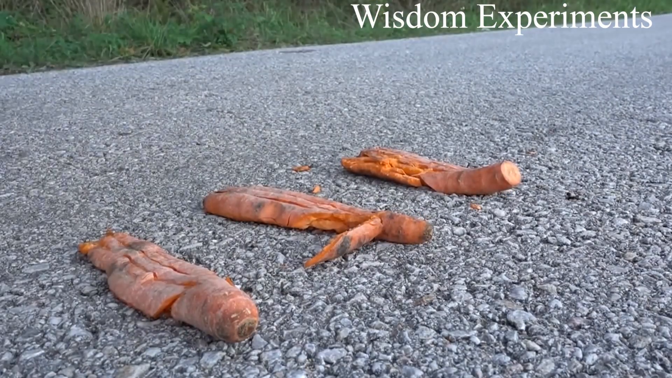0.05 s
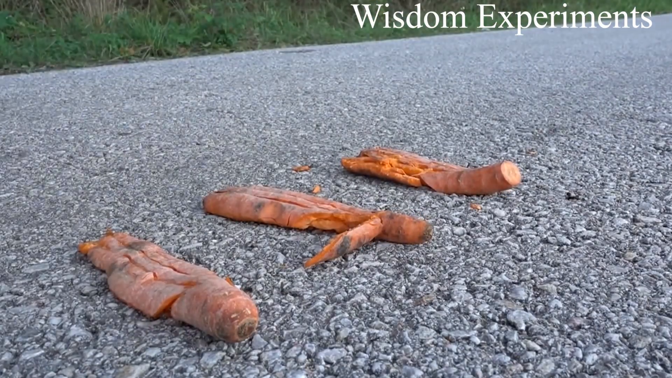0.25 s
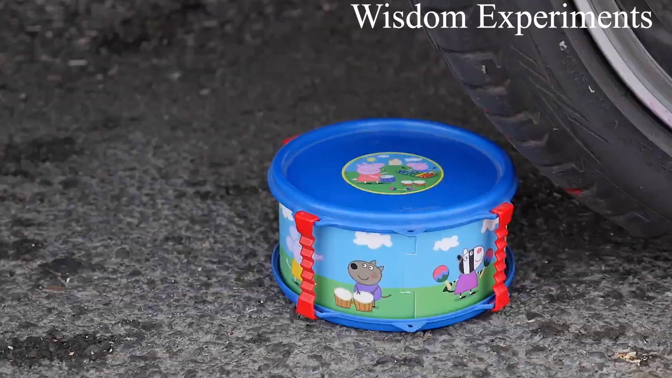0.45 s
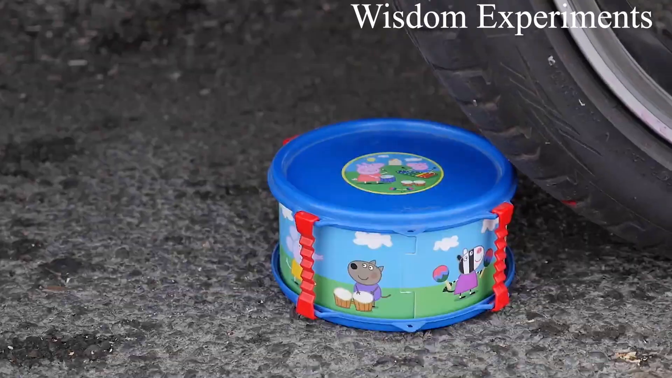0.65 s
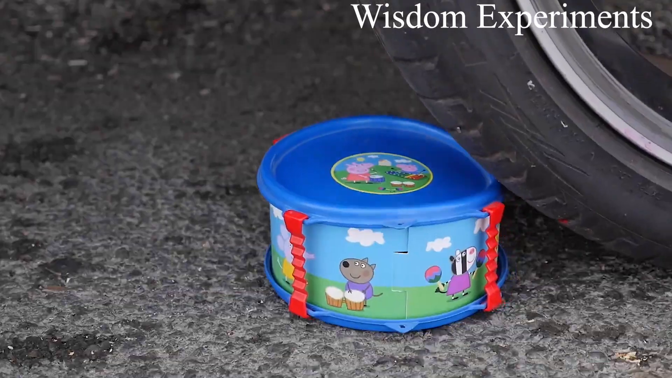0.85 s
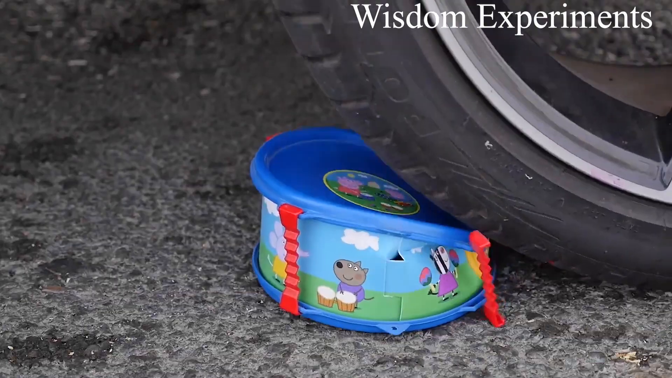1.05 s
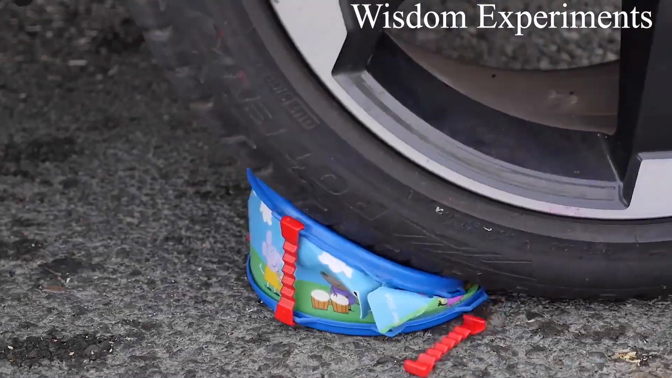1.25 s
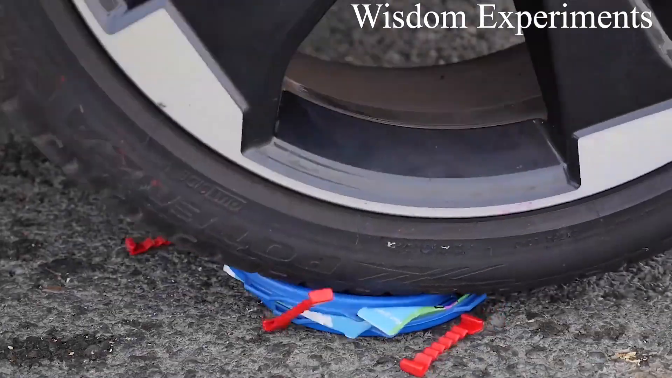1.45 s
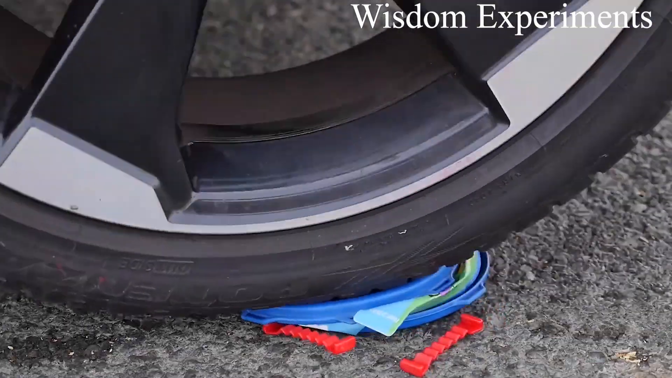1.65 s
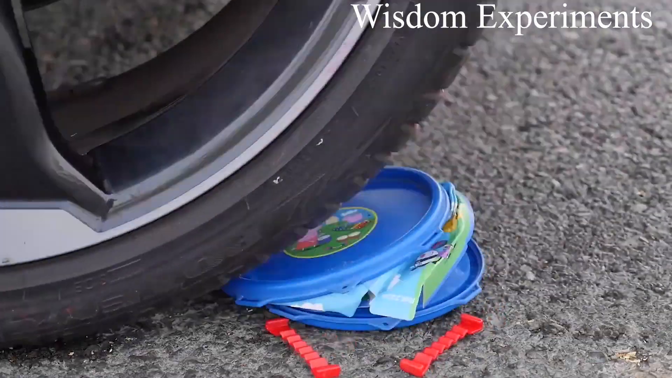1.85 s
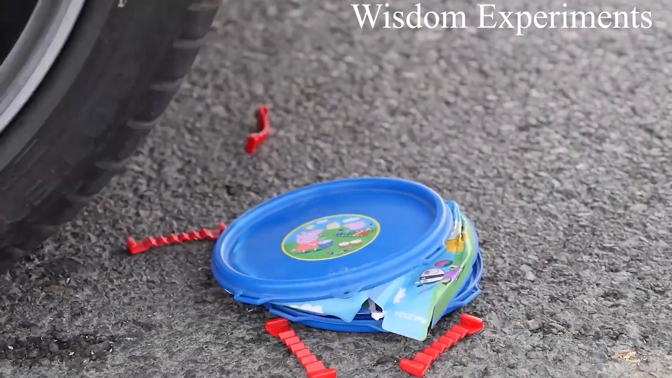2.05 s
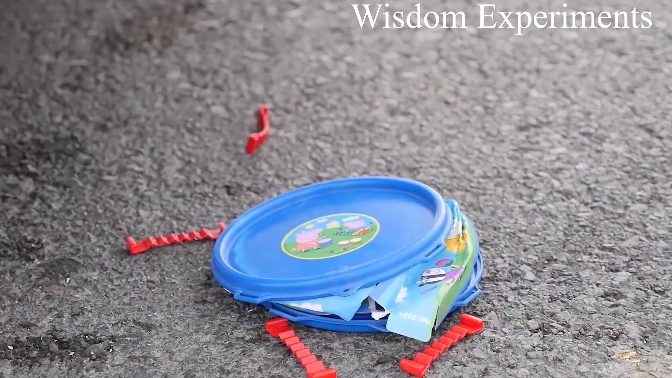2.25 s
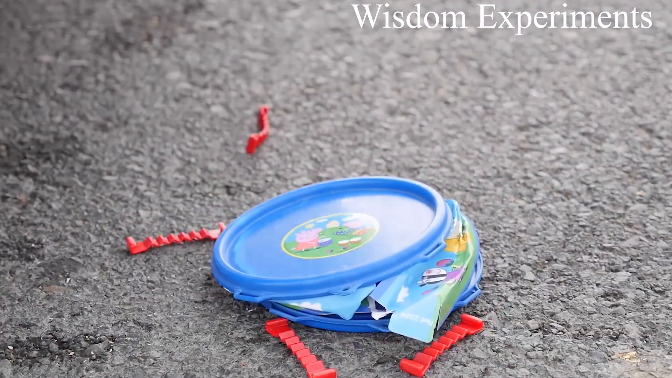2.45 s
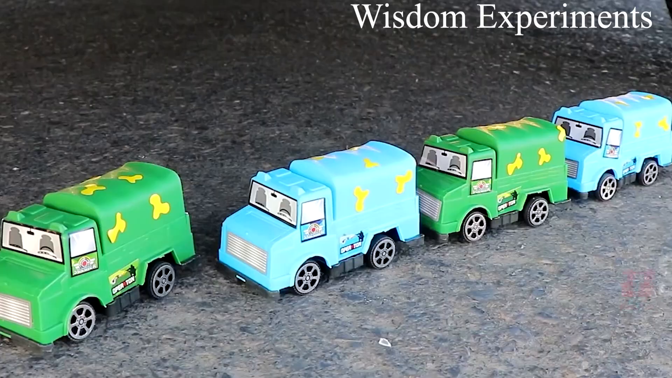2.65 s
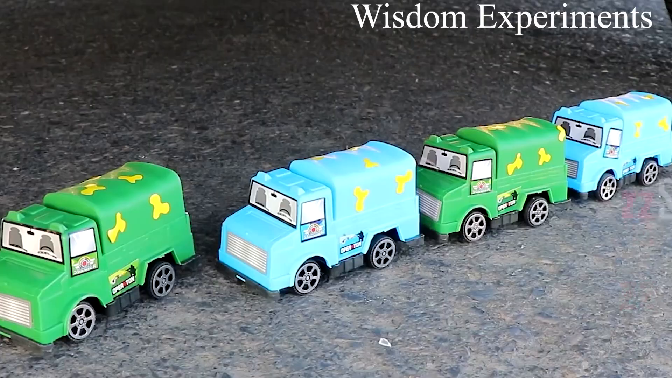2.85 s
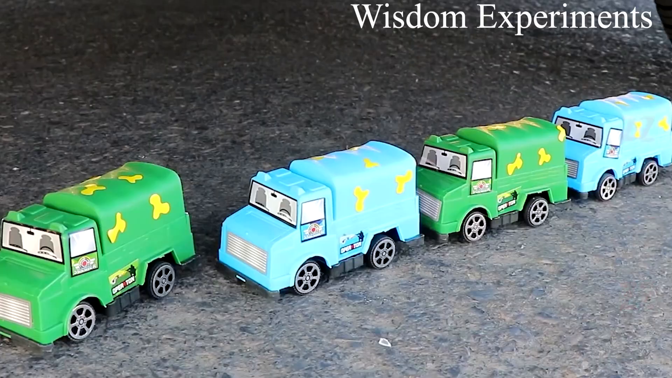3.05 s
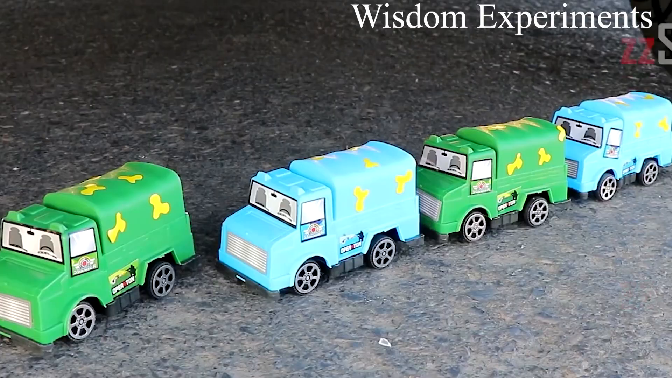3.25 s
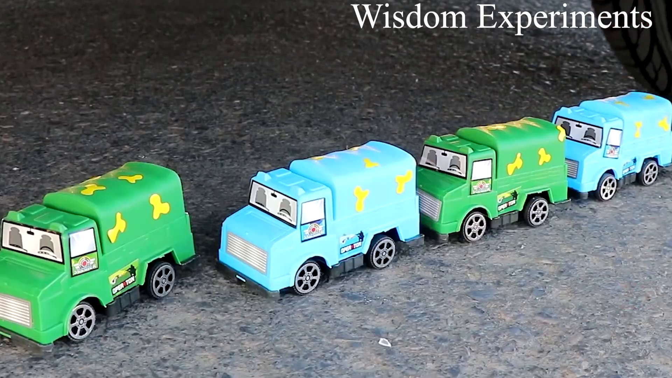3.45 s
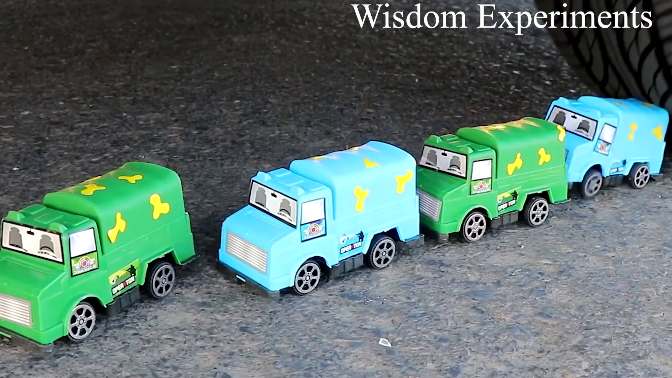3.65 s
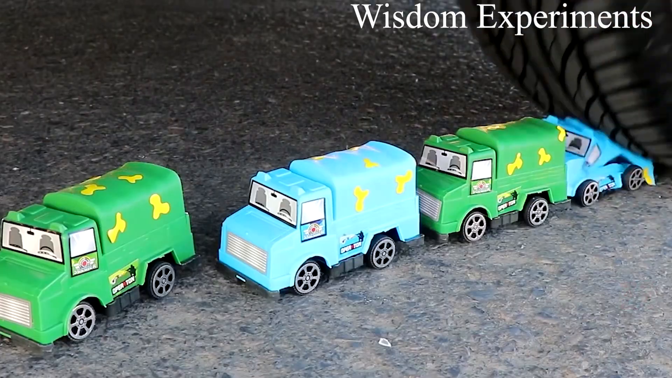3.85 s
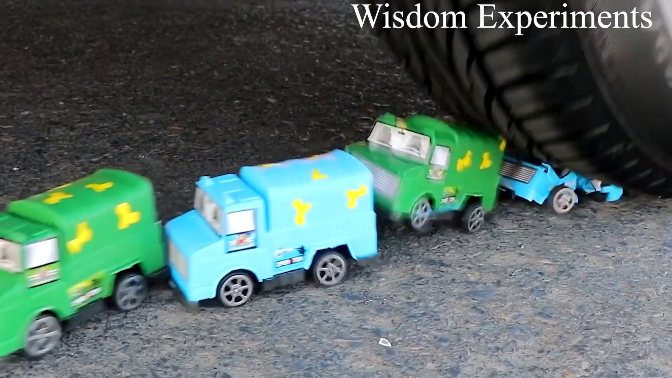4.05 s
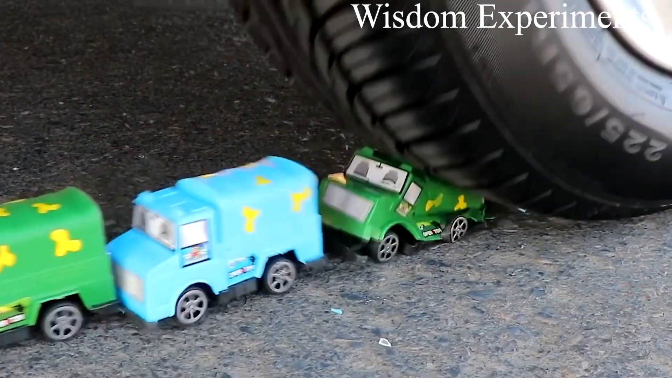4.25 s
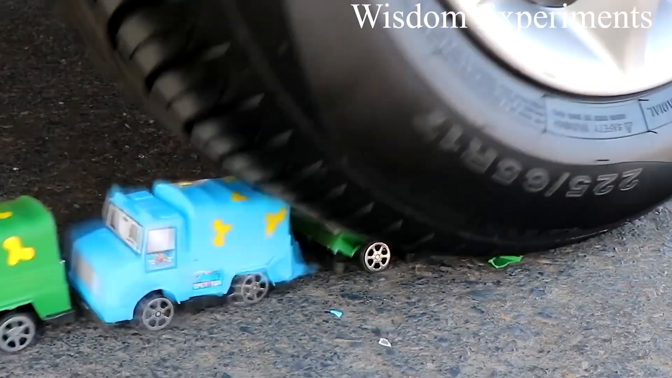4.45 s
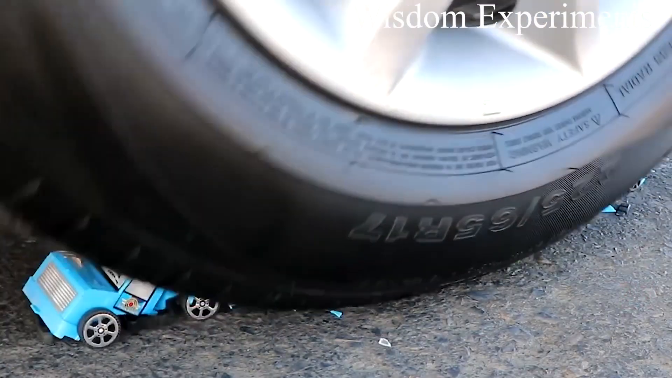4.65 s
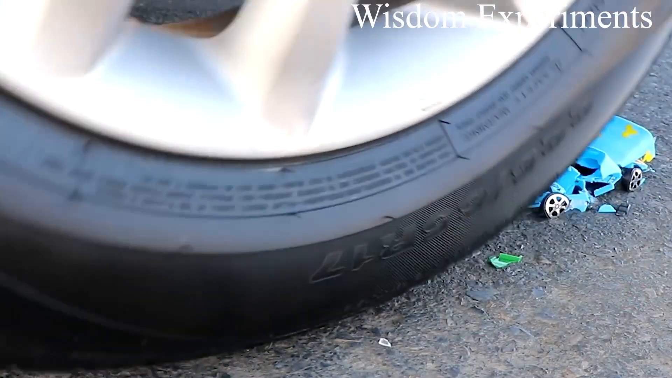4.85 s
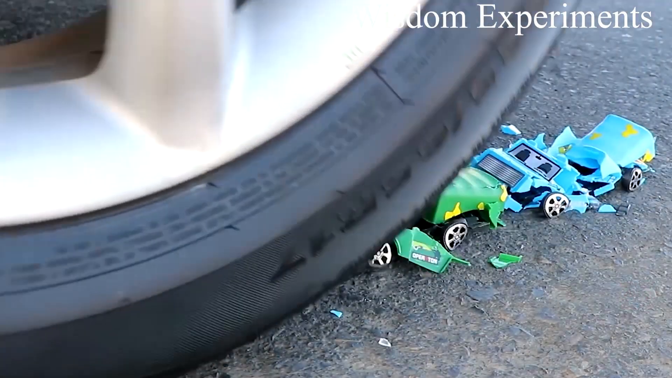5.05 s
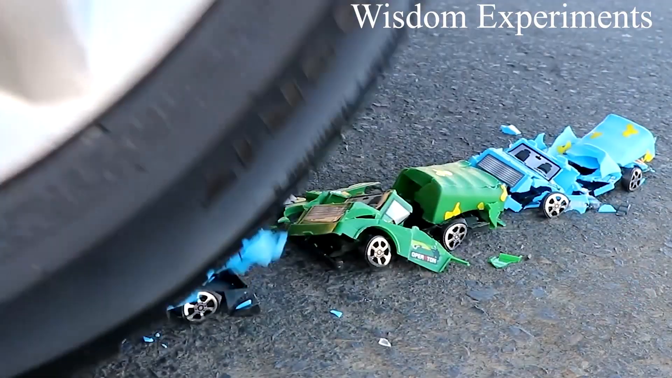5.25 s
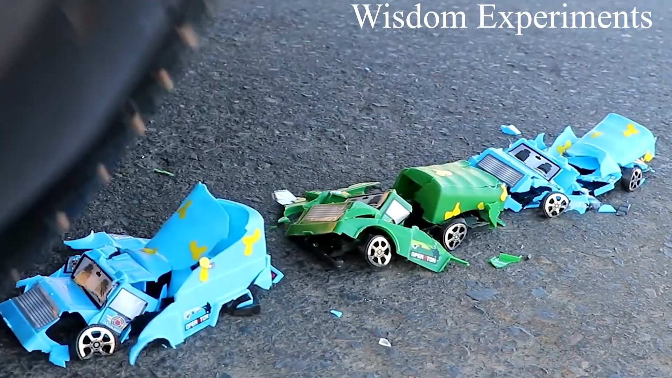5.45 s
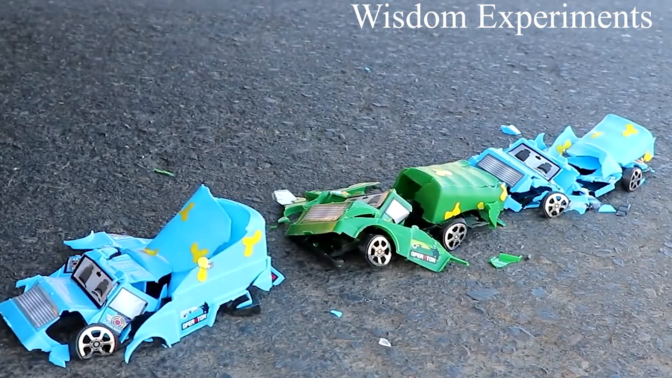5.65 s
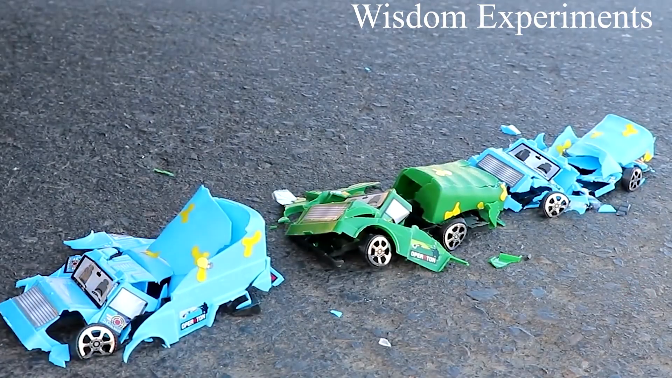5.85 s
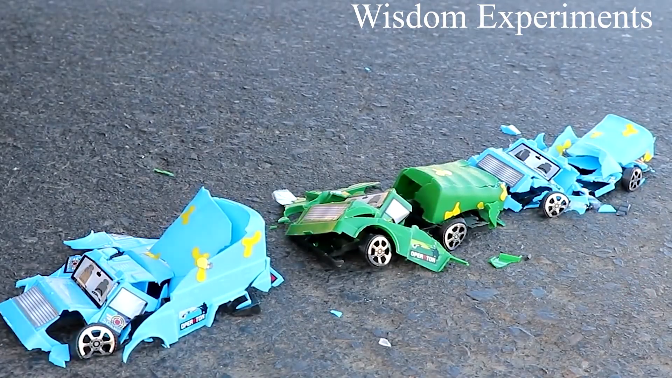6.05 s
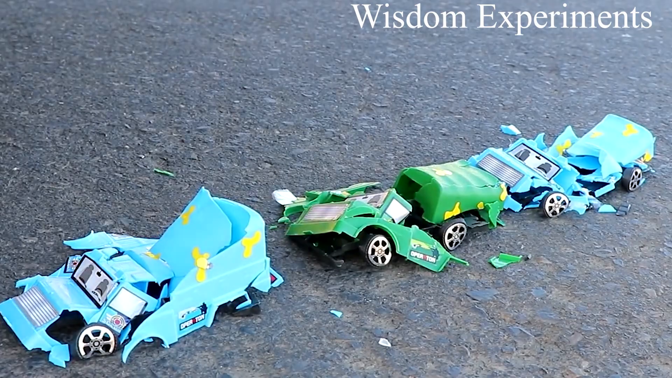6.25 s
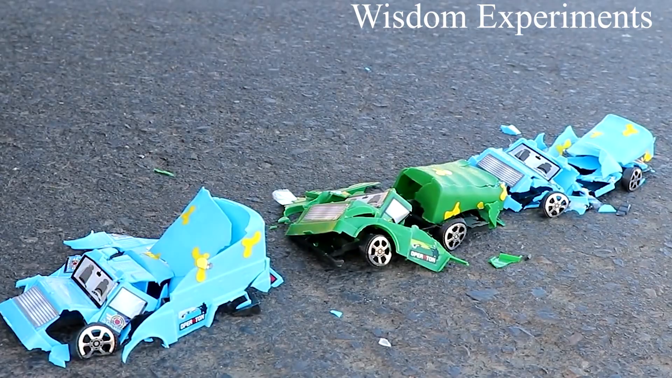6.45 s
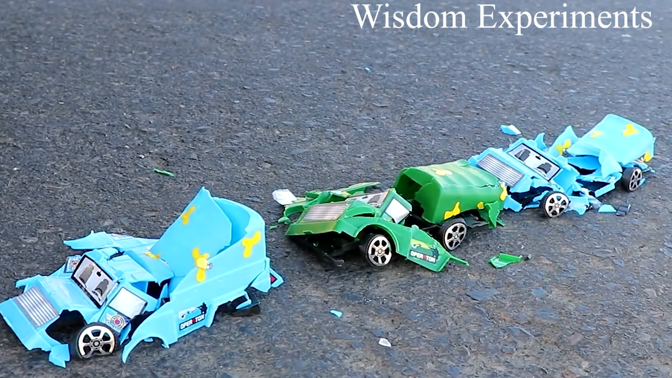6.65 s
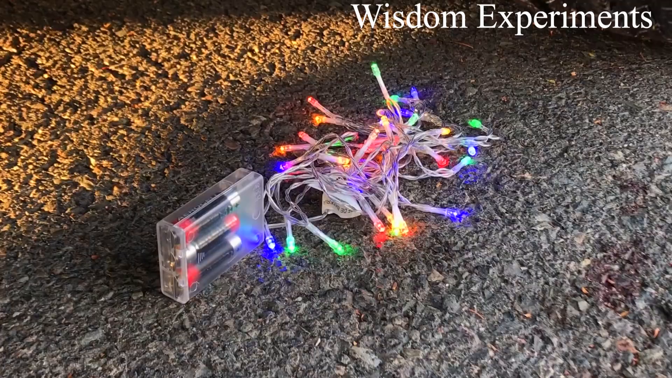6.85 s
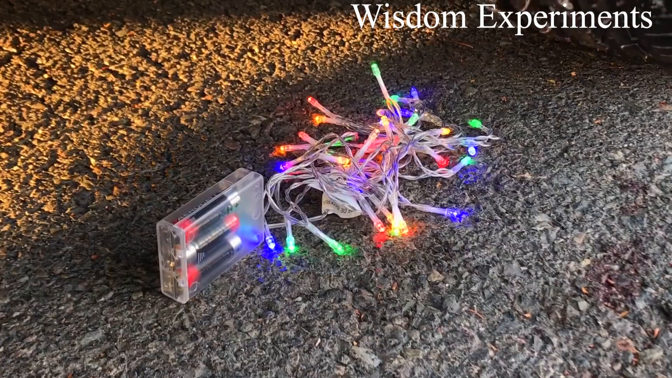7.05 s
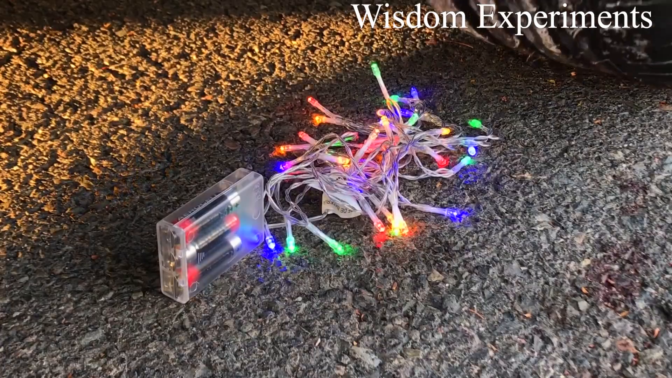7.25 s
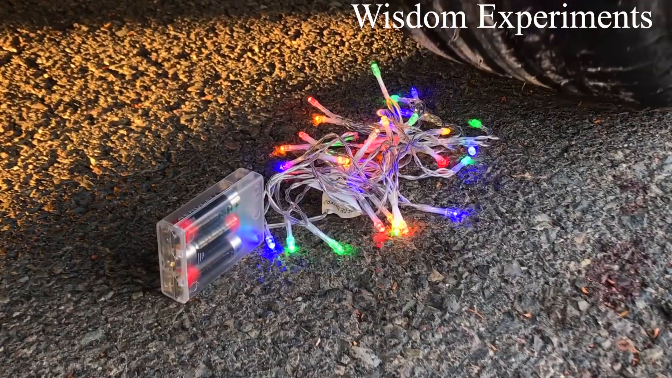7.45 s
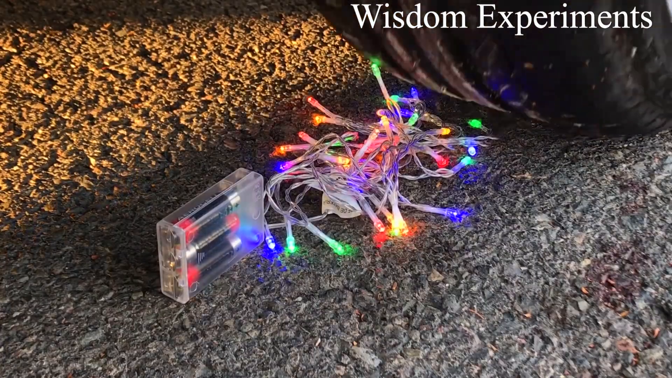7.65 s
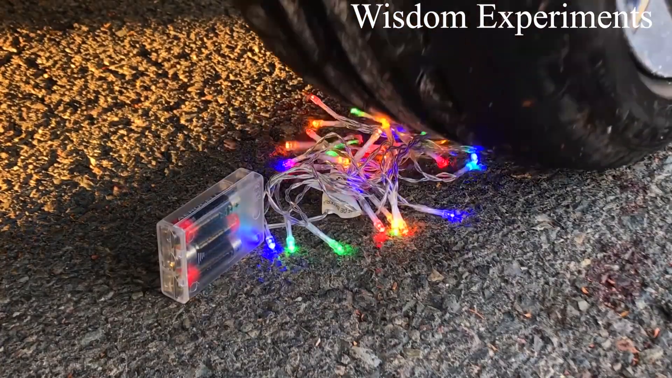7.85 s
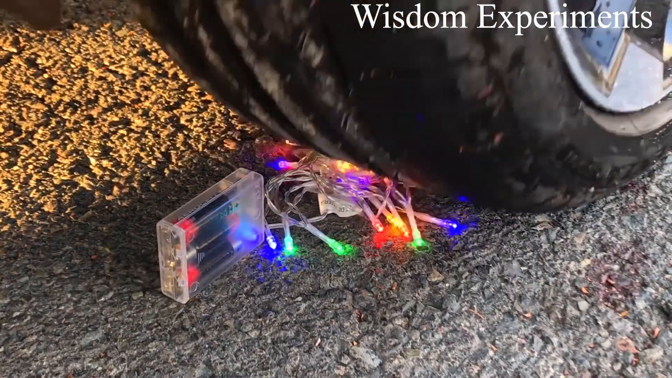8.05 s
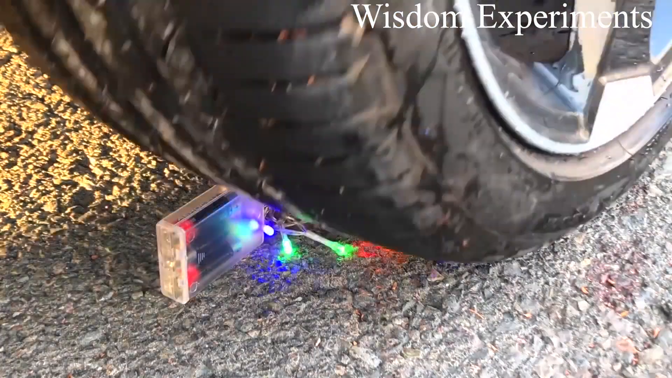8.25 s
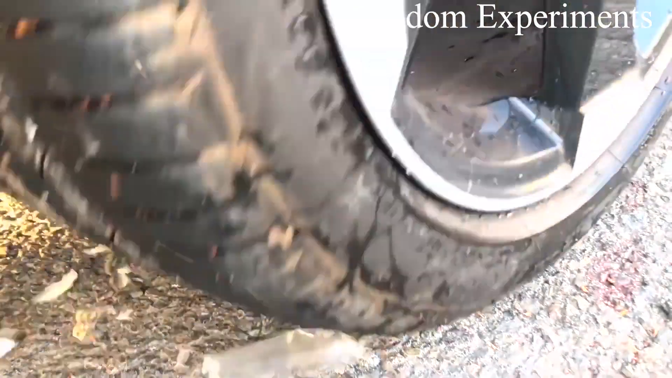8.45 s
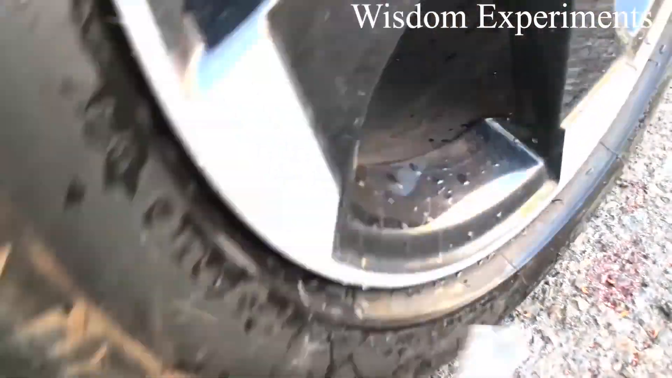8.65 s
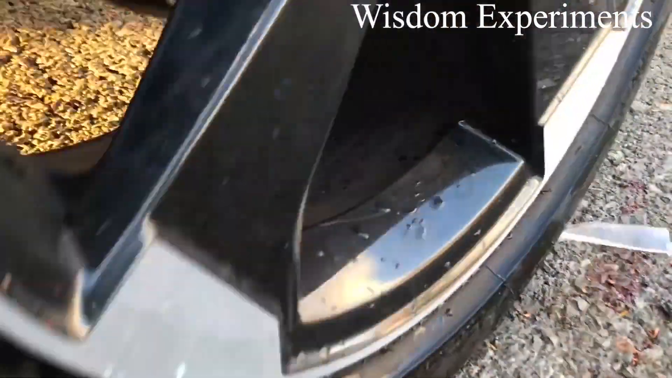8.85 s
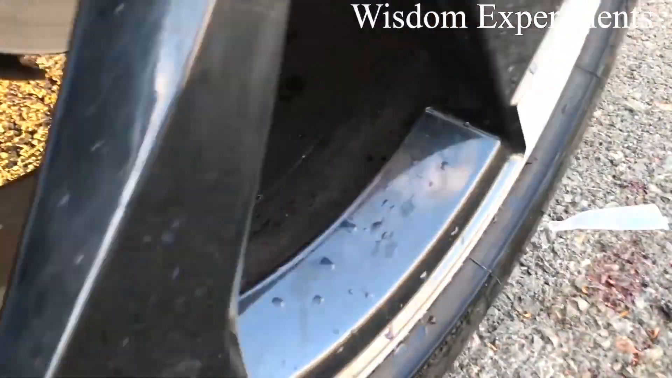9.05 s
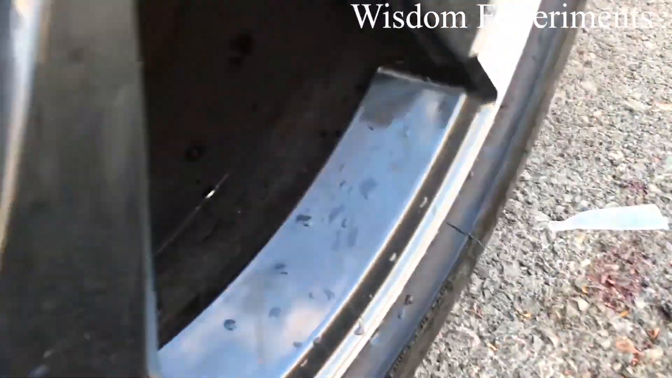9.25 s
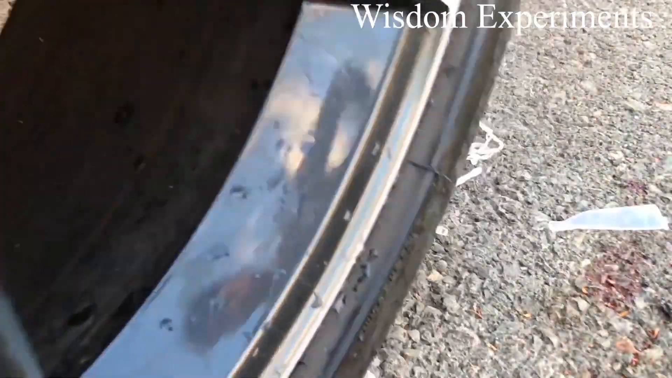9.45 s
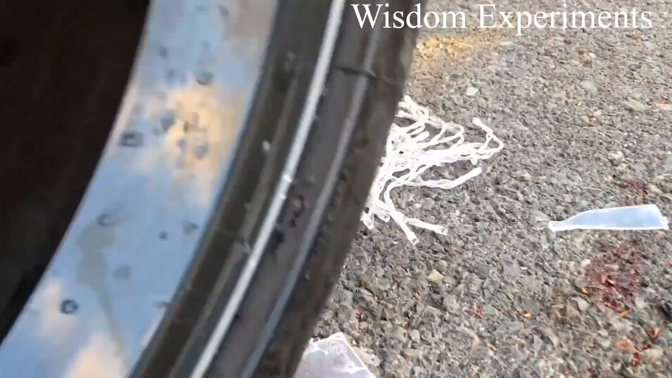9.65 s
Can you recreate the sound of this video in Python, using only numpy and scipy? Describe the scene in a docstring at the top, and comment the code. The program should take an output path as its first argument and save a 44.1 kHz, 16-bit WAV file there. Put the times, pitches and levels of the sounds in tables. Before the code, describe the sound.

Three crushings by a car tyre on asphalt, heard very close and slightly distorted at the peaks. First a toy drum snaps with short hollow rings and scraping; next brittle toy trucks break one after another in a long loud crunch; after a quiet pause, low engine rumble grows, and bulbs and a plastic box crack with thumps, bright splinters and thin squeaks. A short echo surrounds the breaks.

```python
"""A roadside, in four shots: a quiet road, then a car tyre on asphalt close to the microphone crushing
a toy drum, a row of hollow toy trucks, and a light string with its clear battery box.
Each fracture is a burst of noise that tears for a few milliseconds and kicks a resonant plastic wall.
Snaps, scrapes, rings and squeaks lie over a wash of car and outdoor noise; the loudest peaks are
flattened. The drum shot has a thin whine, and an engine hums under the lights."""
import sys
import numpy as np
from scipy import signal
from scipy.fft import rfft, irfft, next_fast_len
from scipy.io import wavfile
from scipy.ndimage import uniform_filter1d, map_coordinates

SR = 44100
rng = np.random.default_rng(int(sys.argv[2]) if len(sys.argv) > 2 else 0)


def pcm_store(signal):
    """Save signal as 16-bit PCM."""
    levels = np.round(np.clip(np.atleast_2d(signal), -1, 1) * 32767)
    wavfile.write(sys.argv[1], SR, levels.astype(np.int16).T)


N = 428652
TIME = np.arange(N) / SR
HIT = np.arange(SR // 4) / SR  # time within one short event, in seconds

# The four shots. Each row: start and end in seconds, time of the loudest wash in seconds, level in dB,
# rise in dB per second, fall in dB per second.
SHOTS = [(0, .49, .3, -39.5, 1, 1), (.49, 2.685, 1.5, -36.5, 2.4, 4.5), (2.684, 6.93, 5.7, -54.5, .1, 6),
         (6.93, 10, 8.2, -43.5, 2.5, 6)]
# Colour of the wash in each shot. Each row: frequency in Hz, relative level in dB.
ROADSIDE_AIR = [(25, -24), (82, -2.5), (340, -2.5), (575, -13), (1650, -13.5), (5280, -29), (16000, -37)]
DRUM_AIR = [(25, -25), (92, -5.5), (277, -3), (560, 2), (840, -3), (1290, -3.5), (2840, -6), (3620, -12),
            (4740, -13), (7310, -22.5), (11900, -24.5), (16000, -35)]
TRUCK_AIR = [(25, -0.5), (50, -3), (100, 0.5), (300, -3.5), (1000, -5), (1400, -11), (2500, -14.5),
             (6000, -28), (11000, -48.5)]
LIGHTS_AIR = [(120, -25.5), (200, -4.5), (254, -9.5), (373, -1), (777, -7.5), (916, -8.5), (2700, -13.5),
              (3900, -14.5), (9580, -24.5), (11700, -19.5), (16000, -25.5)]
# Small ticks of grit and loose shards. Each row: time in seconds, level in dB before a 10 dB cut.
TICKS = [(.4444, -25), (.8729, -17), (.9158, -17.5), (1.9061, -19), (2.1315, -25), (2.227, -28),
         (2.2618, -21), (2.353, -27), (2.437, -22), (2.5097, -26), (2.6509, -23.5), (5.6985, -22),
         (8.2355, -14.5), (9.1049, -19), (9.622, -33)]
# Breaks of the drum, and of the lights with their box. Each row: time in seconds, crack level in dB,
# wall level in dB (both before the object's own gains), wall resonance in Hz, tearing time in seconds.
DRUM_BREAKS = [(.9742, -15, -24.5, 720, .004), (1.0319, -12, -5.5, 470, .003),
               (1.0367, -10, -16.5, 720, .004), (1.0834, -18.5, -26.5, 790, .005),
               (1.1532, -19, -27, 910, .003), (1.1649, -21.5, -10.5, 435, .004),
               (1.1694, -8, -19.5, 1620, .003), (1.1851, -11, -22, 870, .003),
               (1.2999, -10.5, -15, 1460, .008), (1.3639, -19, -15.5, 640, .006),
               (1.3702, -15, -6.5, 1800, .003), (1.4504, -11.5, -28, 1600, .009),
               (1.4599, -12, -22, 1220, .012), (1.5257, -26.5, -17, 730, .012),
               (1.5539, -38, -20.5, 720, .003), (1.6203, -34, -23.5, 700, .005),
               (1.6812, -17.5, -25.5, 1890, .002), (1.9169, -26, -27, 1750, .01),
               (1.968, -6.5, -14, 1900, .0045), (2.003, -17.5, -17.5, 1900, .008)]
LIGHT_BREAKS = [(8.3544, -13, -24, 1080, .004), (8.4383, -8.5, -11, 970, .015), (8.4874, -4, -9, 920, .019),
                (8.5068, -5, -17.5, 1820, .009), (8.5845, -17, -39, 1800, .022),
                (8.6071, -16, -41, 1830, .005), (8.6812, -18.5, -19, 960, .001),
                (8.7068, -10, -24, 1370, .004), (8.8318, -15.5, -24, 1880, .006),
                (8.8383, -10.5, -23, 1860, .002), (8.8674, -15.5, -41, 1890, .003),
                (8.8997, -10, -27, 1690, .002), (8.9583, -10.5, -16, 1160, .005),
                (8.9861, -10.5, -11, 1120, .008), (9.0493, -21, -42.5, 1890, .013),
                (9.1612, -24, -35, 1890, .002), (9.2608, -27.5, -41, 1890, .009),
                (9.402, -29, -46, 1870, .012)]
# Main breaks of the trucks. Each row: time in seconds, crack level in dB, wall level in dB (before gains).
TRUCK_BREAKS = [(3.7987, -4, -1), (3.8096, 1, 1), (3.8348, -4, -5), (3.8602, -12, -14), (3.8816, -6, -16),
                (3.8951, -2, -15), (3.9135, -7, -14), (3.933, -3, -14), (3.9443, 0, -6), (3.9839, -1, -7),
                (4.0093, -2, -10), (4.0543, -2, -10), (4.0919, -6, -10), (4.1074, -5, -12), (4.1358, 4, -8),
                (4.1505, -6, -5), (4.1774, -19, -10), (4.2229, 2, -3), (4.2476, 3.5, -2), (4.2961, 1, -5.5),
                (4.3199, -2, -7.5), (4.3418, -2, -3.5), (4.3677, 3, 1), (4.3909, 1, 1), (4.4058, .5, -6.5),
                (4.4422, 0, -9), (4.4569, -4, -8), (4.4837, 2, -3), (4.5618, -11, -11), (4.5695, 2, 1),
                (4.6187, -1, -8), (4.6561, -4, -3), (4.6754, 3, -5), (4.7087, -2.5, 1.5), (4.7308, -4, -5),
                (4.7428, -5, 0), (4.7876, -2.5, -10), (4.8239, -9, -19), (4.8404, 4, -1), (4.8855, -4, -15),
                (4.9159, -4, -10), (4.9753, -9, -7), (5.0061, -1, 0), (5.0515, -15, -16), (5.1048, -6, 1),
                (5.1298, -5, 0), (5.1964, -8, 2), (5.216, -3.5, 3), (5.2503, -10, -5), (5.2669, 0, 2.5),
                (5.3047, -11, -10), (5.3334, -4.5, -3.5), (5.3945, -1.5, -6), (5.4279, -18, -11),
                (5.4758, -15, -27)]
# Colour of the cracks and of the flexing walls. Each row: frequency in Hz, relative level in dB per Hz.
DRUM_CRACK = [(900, -36.5), (1700, -1), (2400, -1.5), (5000, -3.5), (8000, -10.5), (12000, -14.5),
              (16000, -28)]
TRUCK_CRACK = [(900, -44.5), (1800, 1.5), (3700, -2), (5200, -4.5), (8000, -13.5), (12000, -22),
               (16000, -24.5)]
BOX_CRACK = [(900, -41), (1800, 0), (3200, 2.5), (6000, 1.5), (8500, -3.5), (16000, -4.5)]
DRUM_WALL = [(40, -33), (150, -21), (280, 1.5), (480, -0.5), (900, 1), (1800, -9.5), (3000, -23.5)]
TRUCK_WALL = [(30, -23.5), (100, -3), (250, 0.5), (500, 0), (750, 2), (1300, 0), (1800, -9), (3000, -28)]
BOX_WALL = [(30, -6), (220, 7.5), (450, -1.5), (620, 2.5), (1100, -0.5), (1800, 0.5), (3000, -33)]
# Ringing of the drum's skin and rim. Each row: frequency in Hz, relative level in dB,
# time to fade by 60 dB in seconds.
DRUM_MODES = [(477, -5, .06), (760, -3.5, 0.16), (1993, -5.5, .1), (2789, -6, .1), (4850, -6, .06)]
# The drum caves in: time in seconds, level in dB, rise and fall in dB per second, hold in seconds.
BUCKLE = (1.22, -22.5, 130, 34, .12)
# The drum rustles and scrapes on the road, before and after it caves in. Each row: time in seconds,
# level in dB, rise and fall in dB per second.
SCRAPES = [(.965, -38, 110, 130), (1.33, -29.5, 75, 55), (1.665, -24.5, 260, 600), (1.735, -32, 900, 150),
           (1.95, -36, 150, 160)]
# Colour of dense small snaps. Each row: frequency in Hz, relative level in dB.
BUCKLE_COLOUR = [(120, -29), (300, -4), (480, -0.5), (720, -2.5), (1200, -5.5), (2200, -10.5), (4000, -33)]
SCRAPE_COLOUR = [(900, -18), (2000, 1.5), (4500, 0), (7500, -2.5), (16000, -17)]
GRIND_COLOUR = [(200, -23), (600, -5), (1200, 0), (2200, 1.5), (4500, -8.5), (8000, -21.5), (16000, -31)]
SKID_COLOUR = [(400, -21), (1100, 0), (2200, -1.5), (4500, -12.5), (12000, -35)]
GRIT_COLOUR = [(200, -11), (900, 3), (3000, 0), (7000, -10), (16000, -7)]
# Echo around the car. Each row: frequency in Hz, time to fade by 60 dB in seconds.
YARD_FADE = [(150, .8), (550, 0.83), (1000, 0.46), (2000, 0.2), (7000, 0.16), (15000, 0.05)]
# Larger pieces that ring or thump. Each row: time in seconds, frequency in Hz, level in dB,
# time to fade by 60 dB in seconds.
SHARD_RINGS = [(1.526, 760, -21, .07), (1.554, 700, -21, .06), (1.968, 1973, -19, .13),
               (5.395, 556, -20, .5), (5.428, 662, -36, .8), (5.972, 780, -43, .15), (8.439, 236, -15, .12),
               (8.488, 161, -13.5, .12), (8.492, 210, -31, .62), (8.492, 603, -19, .2),
               (8.506, 3108, -7.5, .1), (8.542, 3273, -21, .2), (8.542, 6743, -19.5, .067),
               (8.584, 6020, -18.5, .069), (8.607, 3650, -25, .07), (8.835, 2020, -23, .13),
               (8.99, 1090, -19, .11), (9.008, 8600, -28, .051), (9.05, 1915, -30, .14)]
# The tyre's weight bears on one truck shell after another. Each row: start in seconds,
# grinding level in dB before a 1 dB cut, length in seconds.
CRUSHES = [(3.82, -20, .22), (4.23, -16.5, .28), (4.58, -11, .15), (4.85, -14.5, .04), (5.12, -17.5, .14)]
# Toys skid and settle. Each row: time in seconds, level in dB.
SKIDS = [(3.734, -24), (5.7, -33), (5.772, -38), (5.838, -24.5), (5.862, -28), (5.947, -44), (5.98, -43),
         (6.04, -51)]
# Rubber slips on the last truck's shell. Each row: start in seconds, length in seconds, level in dB.
SLIPS = [(5.083, .012, -13), (5.105, .04, -9), (5.151, .03, -12), (5.198, .04, -10.5), (5.255, .03, -13)]
# Low engine tones, called orders. Each row: frequency in Hz, relative level in dB.
ENGINE_ORDERS = [(60, 1), (91, -2.5), (124, -21), (183, -12)]
# Colour of the exhaust rumble. Each row: frequency in Hz, relative level in dB per Hz.
RUMBLE = [(20, -11.5), (55, 1), (100, -3), (160, -8), (300, -17.5), (800, -55.5)]
# The engine works to climb the battery box: time in seconds, effort in dB, rise and fall in dB per second,
# hold in seconds.
CLIMB = (8.15, -28.5, 48, 220, .39)
# Tread nears and passes the lights: time in seconds, level in dB, rise and fall in dB per second.
TREAD = (8.33, -35, 24, 17)
# Box pieces squeak under the rubber. Each row: start in seconds, length in seconds, level in dB,
# starting pitch in Hz, glide in Hz per second.
SQUEAKS = [(8.515, .05, -24, 3500, -6000), (8.6, .04, -30, 3650, -11000), (9.37, .125, -42, 1940, -350)]

TRUCK_TEAR_S, TEAR_DOUBLES_DB = .0055, 16  # tearing time of a 0 dB break; it doubles for every 16 dB more
# Where the crack outweighs the wall, the piece is smaller and its resonance higher.
PIECE_HZ, PIECE_OCTAVE_DB = 1090, 14  # a large piece; one octave up for each 14 dB
PIECE_SCATTER_OCT, SMALLEST_PIECE_HZ = .2, 1900  # random scatter and upper limit of the resonance
AFTER_S, AFTER_SPREAD_S, AFTER_DB = .008, .012, -13  # lesser break: least delay, extra delay, average drop
CRUSH_RISE_DB_PER_S, CRUSH_FALL_DB_PER_S = 220, 125
SKID_RISE_DB_PER_S, SKID_FALL_DB_PER_S = 900, 600
SLIP_HZ, SLIP_RISE_HZ_PER_S, SLIP_EDGE_S = 1170, 14000, .006  # the pitch climbs as the shell tightens
IDLE_DB = -40.3  # engine effort beside the lights
TOP_HZ = 16000  # top of the sound's band


def amp(db):
    """Turn decibels into a plain gain."""
    return 10 ** (np.asarray(db) / 20)


def unit(x):
    """Scale a sound to an rms level of 1."""
    return x / np.sqrt(np.mean(x ** 2) + 1e-20)


def along(points, hz):
    """Read a curve of (Hz, value) points on a log frequency axis."""
    f, v = np.transpose(points)
    return np.interp(np.log(hz + 1), np.log(f + 1), v)


def wobble(rate, t=TIME):
    """A smooth random curve with this many random points a second."""
    return map_coordinates(rng.standard_normal(int(t[-1] * rate) + 4), [t * rate])


def coloured(x, spectrum, ripple_db=0, ripple_hz=130):
    """Filter x to this spectrum; ripple adds the chance resonances of an odd-shaped piece."""
    m = 2 * next_fast_len(len(x) // 2 + 4096)
    hz = np.fft.rfftfreq(m, 1 / SR)
    ripple = map_coordinates(rng.standard_normal(size=1024), [hz / ripple_hz], mode="mirror")
    # Folding the cepstrum makes the filter act only after each input, never before it.
    cepstrum = irfft(np.log(amp(along(spectrum, hz) + ripple_db * ripple)), m)
    cepstrum[1:m // 2] *= 2
    cepstrum[m // 2 + 1:] = 0
    response = np.exp(rfft(cepstrum))
    return irfft(rfft(x, m) * response, m)[:len(x)]


def add(track, s, sound):
    """Mix a sound in at time s."""
    part = track[round(s * SR):][:len(sound)]
    part += sound[:len(part)]


def swell(s, db, rise, fall, hold=0):
    """Gain that climbs to its peak at time s, holds and dies away; rates in dB a second."""
    before = np.maximum(s - TIME, 0)
    after = np.maximum(TIME - s - hold, 0)
    return amp(db - abs(rise) * before - abs(fall) * after)


def swells(rows):
    """The joint gain of several swells, added as powers."""
    return np.sqrt(sum(swell(*row) ** 2 for row in rows))


def during(start, end):
    """1 between two times and 0 outside, with short ramps."""
    return uniform_filter1d(1. * ((TIME >= start) & (TIME < end)), size=600)


def tearing(tear, t60, rattle_db, rattle_t60):
    """A sharp first break, a run of uneven ones while the crack travels, a fast decay, a weaker rattle."""
    after = np.maximum(HIT - tear, 0)
    knots = HIT[::44]  # about one a millisecond
    uneven = np.interp(HIT, knots, amp(3 * rng.standard_normal(len(knots))))
    first = amp(13.5 - 720 * tear - 60 * HIT / .007)  # slow tears start more gently
    decay = amp(-60 * after / t60)
    rattle = amp(rattle_db - 60 * after / rattle_t60)
    return rng.standard_normal(len(HIT)) * (first + uneven * (decay + rattle))


def at_level(x, tear, db):
    """Scale a burst so that its opening has this rms level."""
    opening = x[HIT < abs(tear) + .001]
    return amp(db) * x / np.sqrt(np.mean(opening ** 2))


def fractures(rows, crack_colour, wall_colour, crack_t60, wall_t60, rattle_db, rattle_t60,
              wall_q, broad_db, crack_gain_db, wall_gain_db):
    """Each break gives a bright crack and kicks a piece of wall that has its own resonance."""
    out = np.zeros(N)
    for s, crack_db, wall_db, hz, tear in rows:
        burst = tearing(tear, crack_t60, rattle_db, rattle_t60)
        crack = coloured(burst, crack_colour, ripple_db=3.5, ripple_hz=210)
        kick = tearing(tear, wall_t60, rattle_db, rattle_t60)
        wall = signal.lfilter(*signal.iirpeak(hz, wall_q, SR), kick) + amp(broad_db) * kick
        wall = coloured(wall, wall_colour, ripple_db=2.5, ripple_hz=110)
        crack = at_level(crack, tear, crack_db + crack_gain_db)
        wall = at_level(wall, tear, wall_db + wall_gain_db)
        add(out, s, crack + wall)
    return out


def mode(hz, db, t60):
    """One dying resonance, unsteady because the piece is still being bent."""
    drift = np.cumsum(rng.standard_normal(len(HIT))) / np.sqrt(SR)
    return amp(db - 60 * HIT / t60) * np.sin(2 * np.pi * hz * HIT + 6 * drift)


def crackle(rate, spread_db, t60, colour):
    """Dense tiny snaps of uneven size in a resonant piece, at rms 1; rate is snaps a second."""
    snaps = rng.random(N) < rate / SR
    sizes = snaps * amp(spread_db * np.clip(rng.standard_normal(N), -2, 2))
    energy = signal.lfilter([1], [1, -amp(-120 / (t60 * SR))], sizes ** 2)  # falls 60 dB in t60
    return unit(coloured(np.sqrt(energy) * rng.standard_normal(N), colour, ripple_db=3))


def splinters(rows, low_hz, high_hz, ring_db, t60, count):
    """Every crack frees splinters that ring at random pitches, levels and lengths."""
    out = np.zeros(N)
    for s, crack_db, *_ in rows:
        for pitch, size, life in rng.random((count, 3)):
            hz = low_hz + (high_hz - low_hz) * pitch
            add(out, s, mode(hz, crack_db + ring_db - 10 * size, t60 * (.5 + life)))
    return out


def squeak(length, db, hz, glide, rough_hz, edge_s):
    """Rubber slipping on plastic: a gliding resonance whose strength and phase stutter."""
    phase = 2 * np.pi * np.cumsum(hz + glide * HIT) / SR
    tone = wobble(rough_hz, HIT) * np.cos(phase) + wobble(rough_hz, HIT) * np.sin(phase)
    gate = np.clip(np.minimum(HIT, length - HIT) / edge_s, 0, 1)
    return at_level(gate * tone, length, db)


def air():
    """Each shot has its own wash of car and outdoor noise, which swells as the car nears."""
    out = np.zeros(N)
    spectra = [ROADSIDE_AIR, DRUM_AIR, TRUCK_AIR, LIGHTS_AIR]
    for (start, end, *nearing), spectrum in zip(SHOTS, spectra):
        gain = during(start, end) * swell(*nearing) * amp(.5 * wobble(9))
        out += gain * unit(coloured(rng.standard_normal(N), spectrum))
    return out


def ticks():
    """Single stones and shards shift, each a short burst of noise."""
    out = np.zeros(N)
    for s, db in TICKS:
        tick = coloured(tearing(.002, 0.033, -13.5, .08), DRUM_CRACK)
        add(out, s, at_level(tick, .002, db - 10))
    return out


def whine():
    """A thin whine from the car in the drum shot: one tone, slightly unsteady in strength and phase."""
    gain = amp(-50) * during(*SHOTS[1][:2]) * (1 + .3 * wobble(25))
    return gain * np.sin(2 * np.pi * 2002 * TIME + .8 * wobble(33))


def ringing(rows, modes, ring_db):
    """Every crack rings the object's own resonances at new strengths."""
    out = np.zeros(N)
    for s, crack_db, *_ in rows:
        add(out, s, sum(mode(hz, crack_db + ring_db + db + rng.normal(0, 3), t60) for hz, db, t60 in modes))
    return out


def drum():
    """The drum's shell snaps and rings, buckles in dull pops and scrapes on the road."""
    snaps = fractures(DRUM_BREAKS, DRUM_CRACK, DRUM_WALL, crack_t60=0.057, wall_t60=0.061, rattle_db=-21,
                      rattle_t60=.09, wall_q=4, broad_db=-17, crack_gain_db=-1.5, wall_gain_db=-1)
    buckling = swell(*BUCKLE) * crackle(220, 7.3, 0.016, BUCKLE_COLOUR)
    scraping = swells(SCRAPES) * crackle(1500, 7.3, 0.01, SCRAPE_COLOUR)
    return snaps + ringing(DRUM_BREAKS, DRUM_MODES, ring_db=-18) + buckling + scraping


def yard(x):
    """The car's underside and the surroundings answer with fading noise; the low middle lingers."""
    hz, t, z = signal.stft(rng.standard_normal(SR), SR, nperseg=256)
    fade = amp(-60 * t / along(YARD_FADE, hz)[:, None])
    tail = signal.istft(z * fade, SR, nperseg=256)[1]
    delayed = np.pad(tail, (300, 0))  # in samples
    return signal.fftconvolve(x, delayed / np.linalg.norm(tail))[:N]


def shard_rings():
    """Larger pieces thump or spring free and ring on; a close second mode makes each one beat."""
    out = np.zeros(N)
    for s, hz, db, t60 in SHARD_RINGS:
        second_hz = hz * (1 + rng.uniform(.015, .04))
        add(out, s, mode(hz, db, t60) + mode(second_hz, db - 7, t60 / 2))
    return out


def truck_breaks():
    """Harder breaks tear longer, brighter ones free smaller pieces, and a lesser break follows each."""
    rows = []
    for s, crack_db, wall_db in TRUCK_BREAKS:
        lag, size = rng.random(2)
        tear = TRUCK_TEAR_S * 2 ** (max(crack_db, wall_db) / TEAR_DOUBLES_DB)
        scatter = PIECE_SCATTER_OCT * rng.standard_normal(2)
        octaves = max(crack_db - wall_db, 0) / PIECE_OCTAVE_DB + scatter
        hz, after_hz = np.minimum(PIECE_HZ * 2 ** octaves, SMALLEST_PIECE_HZ)
        drop_db = AFTER_DB * (.5 + size)
        after_s = s + AFTER_S + AFTER_SPREAD_S * lag
        rows += [(s, crack_db, wall_db, hz, tear),
                 (after_s, crack_db + drop_db, wall_db + drop_db, after_hz, tear / 2)]
    return rows


def load():
    """How hard the shards are ground, from the second main break to the last."""
    shells = swells([(s, db, CRUSH_RISE_DB_PER_S, CRUSH_FALL_DB_PER_S, length) for s, db, length in CRUSHES])
    return shells * during(TRUCK_BREAKS[1][0], TRUCK_BREAKS[-1][0])


def trucks():
    """Hollow brittle bodies burst one after another; the pieces ring, grind and skid."""
    snaps = fractures(truck_breaks(), TRUCK_CRACK, TRUCK_WALL, crack_t60=.024, wall_t60=0.032, rattle_db=-15,
                      rattle_t60=0.12, wall_q=3.5, broad_db=-10, crack_gain_db=-1.5, wall_gain_db=-1.5)
    grinding = amp(-1) * load() * crackle(320, 7.8, 0.0069, GRIND_COLOUR)
    skids = swells([(s, db, SKID_RISE_DB_PER_S, SKID_FALL_DB_PER_S) for s, db in SKIDS])
    skidding = skids * crackle(1600, 3, .012, SKID_COLOUR)
    shards = splinters(TRUCK_BREAKS, 600, 5500, ring_db=-9, t60=0.06, count=6)
    return snaps + shards + grinding + skidding


def groan():
    """Rubber drags over the last truck's shell: each slip is a rough squawk that rises in pitch."""
    out = np.zeros(N)
    for s, length, db in SLIPS:
        add(out, s, squeak(length, db, SLIP_HZ, SLIP_RISE_HZ_PER_S, rough_hz=700, edge_s=SLIP_EDGE_S))
    return out


def engine():
    """Low engine orders waver over an exhaust rumble; the idle swells for the climb."""
    turns = np.cumsum(1 + .008 * wobble(7.1)) / SR  # time, with a slightly uneven speed
    hum = sum(amp(db + 2.7 * wobble(5.6)) * np.sin(2 * np.pi * hz * turns) for hz, db in ENGINE_ORDERS)
    rumble = coloured(rng.standard_normal(N), RUMBLE)
    effort = during(*SHOTS[3][:2]) * np.hypot(amp(IDLE_DB), swell(*CLIMB))
    return effort * (amp(-3.5) * unit(hum) + amp(-5) * unit(rumble))


def box_squeaks():
    """Hard pieces of the battery box give thin, falling squeaks."""
    out = np.zeros(N)
    for s, *slip in SQUEAKS:
        add(out, s, squeak(*slip, rough_hz=130, edge_s=.02))
    return out


def lights():
    """Bulbs and the hard battery box shatter brightly over gritty tread noise; the pieces squeak."""
    snaps = fractures(LIGHT_BREAKS, BOX_CRACK, BOX_WALL, crack_t60=0.028, wall_t60=0.044, rattle_db=-13,
                      rattle_t60=0.17, wall_q=4, broad_db=-10.5, crack_gain_db=0, wall_gain_db=-1.5)
    grit = crackle(1200, 5.5, .008, GRIT_COLOUR)
    tread = during(*SHOTS[3][:2]) * swell(*TREAD) * grit
    shards = splinters(LIGHT_BREAKS, 1800, 15000, ring_db=-15, t60=.11, count=14)
    return snaps + shards + tread + box_squeaks()


def scene():
    """Crush the three toys, let the surroundings answer, and add the car and the air."""
    toy, row, string = drum(), trucks() + groan(), lights()
    echo = yard(amp(-21.5) * toy + amp(-20.5) * row + amp(-28.5) * string)
    crushed = toy + row + string + shard_rings() + ticks()
    return (crushed + echo + engine() + whine() + air())[None]


def record(dry):
    """The loudest peaks are flattened, and nothing sounds above 16 kHz."""
    clipped = dry / (1 + np.abs(dry / .9) ** 8) ** (1 / 8)
    cut = 1 + (np.fft.rfftfreq(N, 1 / SR) / TOP_HZ) ** 200
    return irfft(rfft(clipped) / cut, N)


dry = scene()
out = record(dry)
pcm_store(out)
```